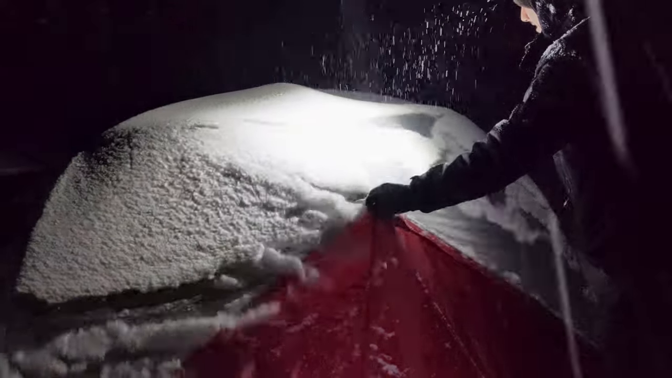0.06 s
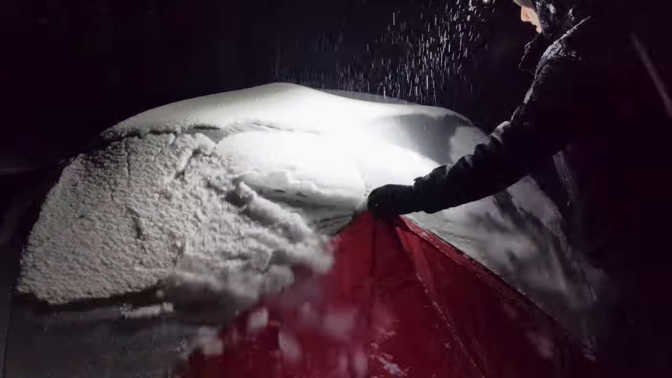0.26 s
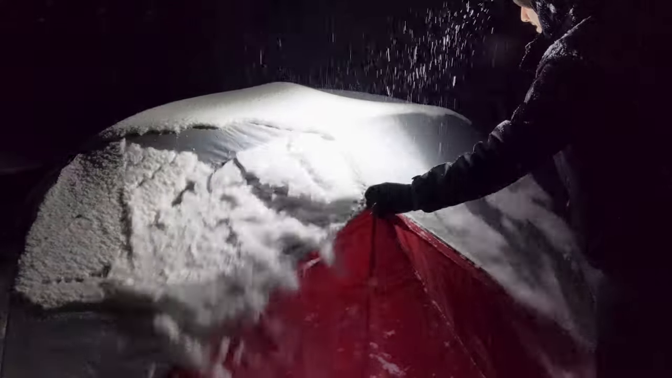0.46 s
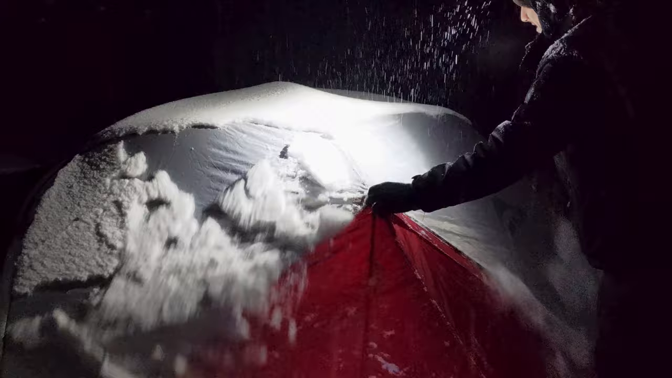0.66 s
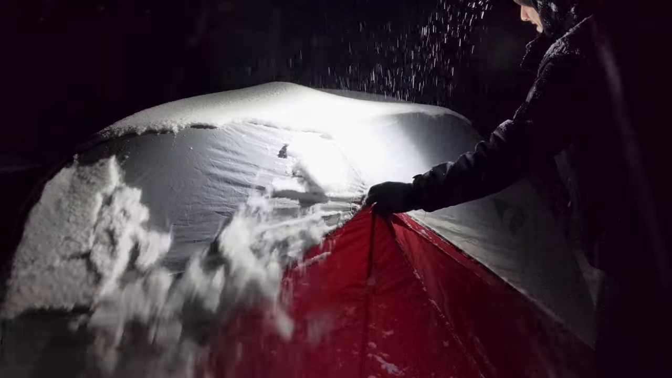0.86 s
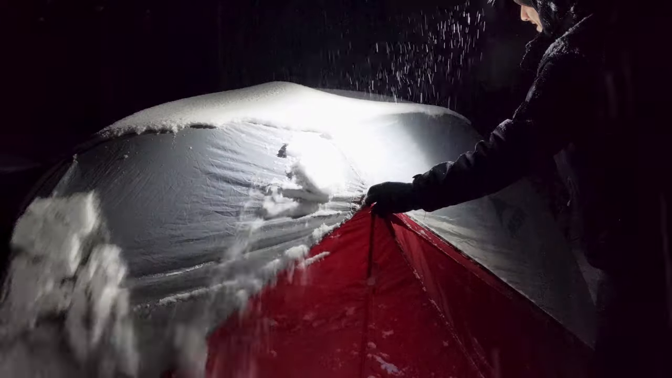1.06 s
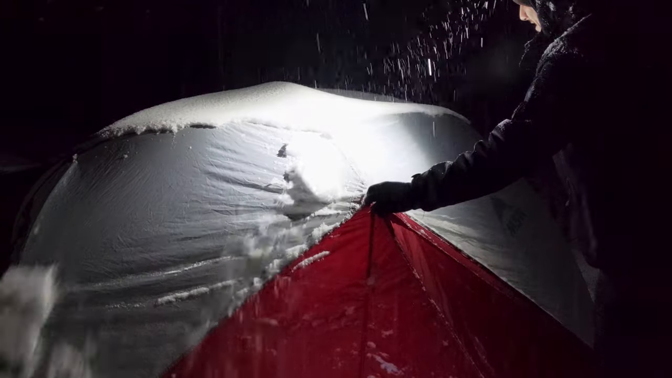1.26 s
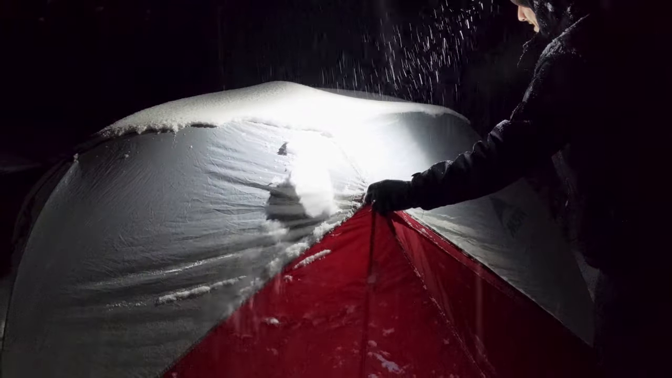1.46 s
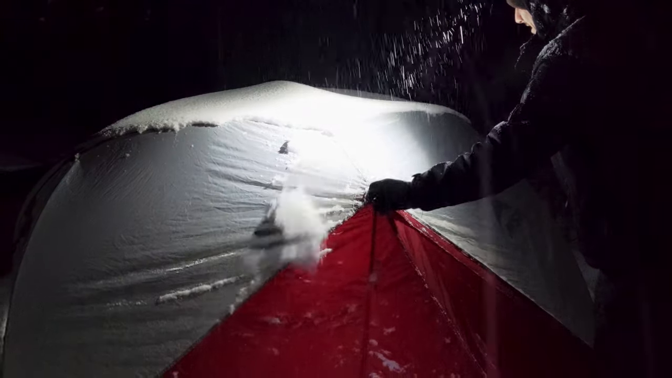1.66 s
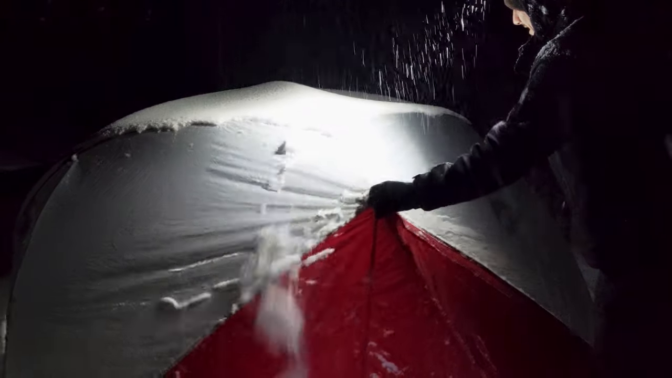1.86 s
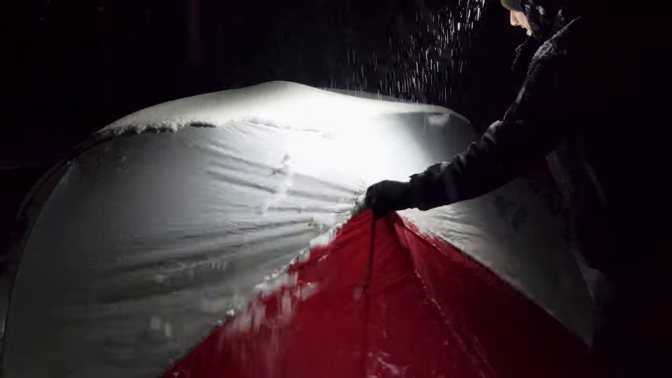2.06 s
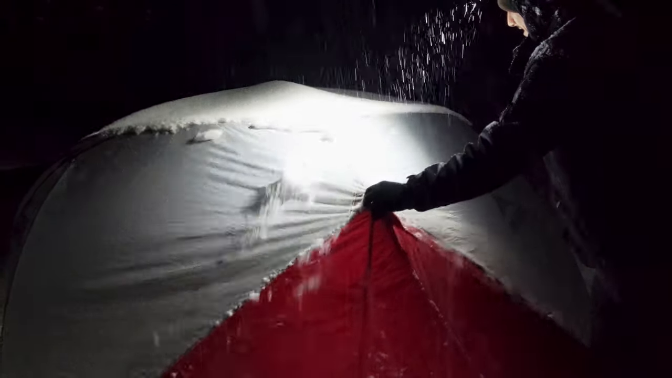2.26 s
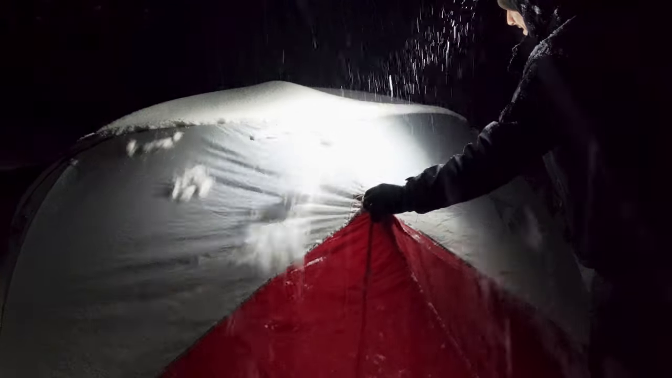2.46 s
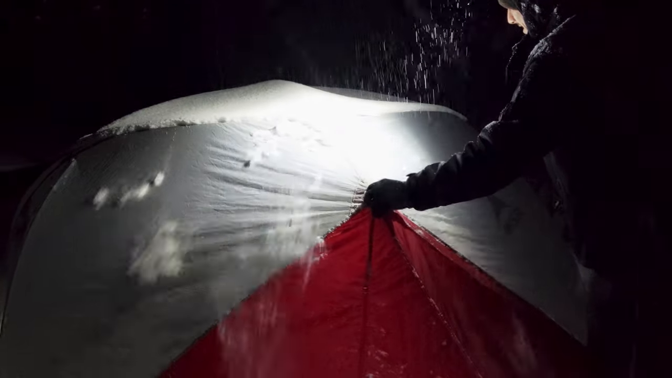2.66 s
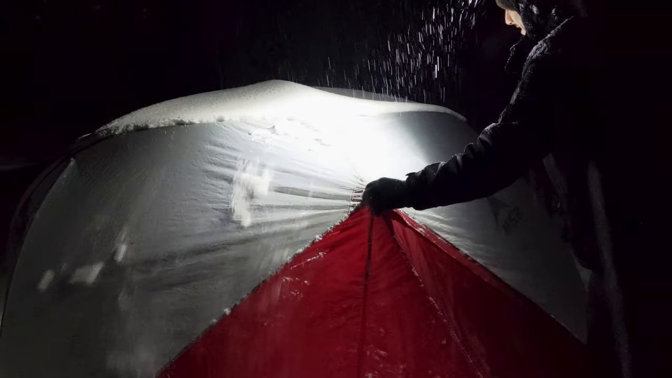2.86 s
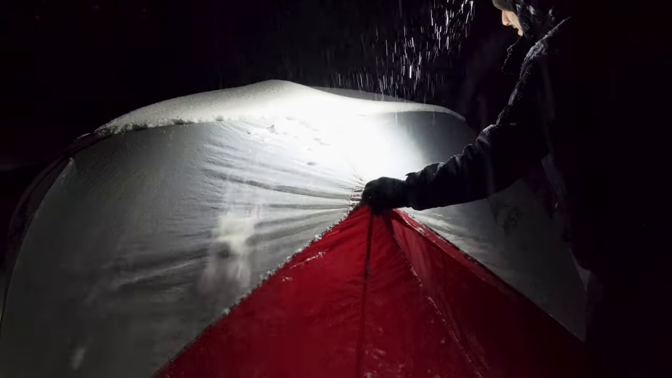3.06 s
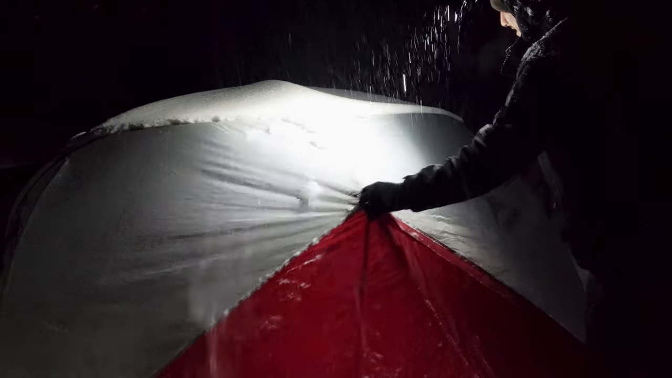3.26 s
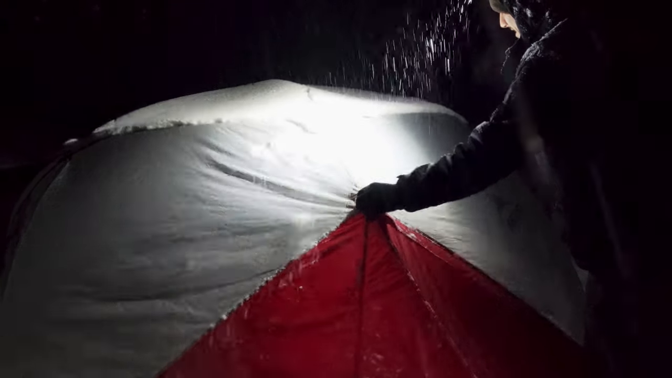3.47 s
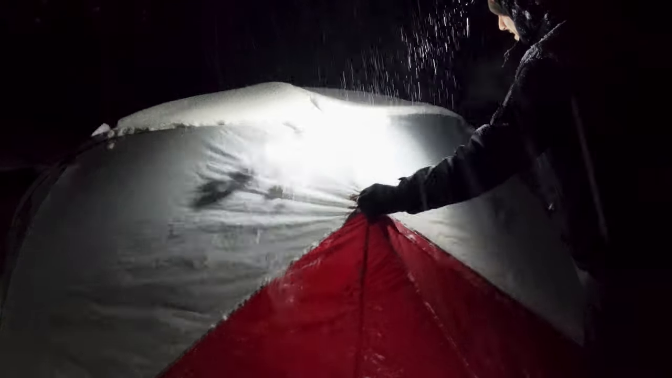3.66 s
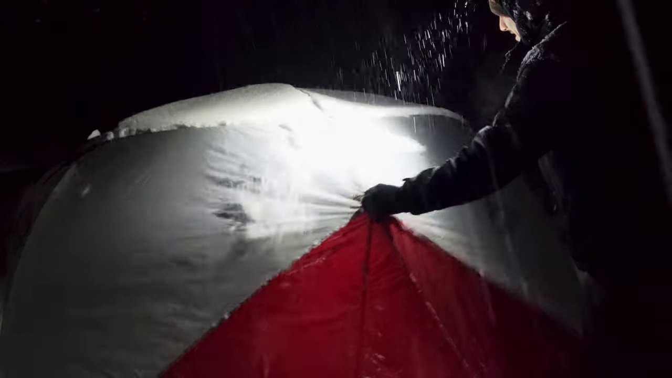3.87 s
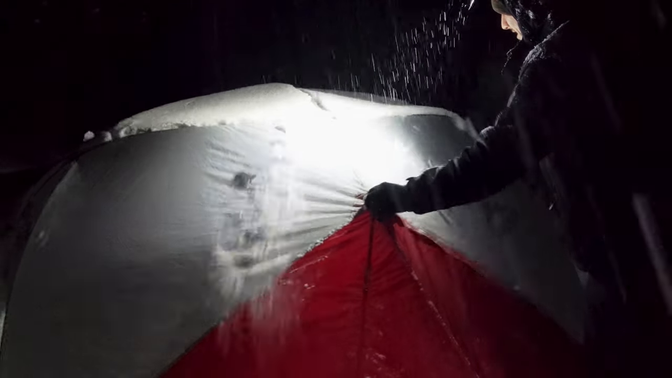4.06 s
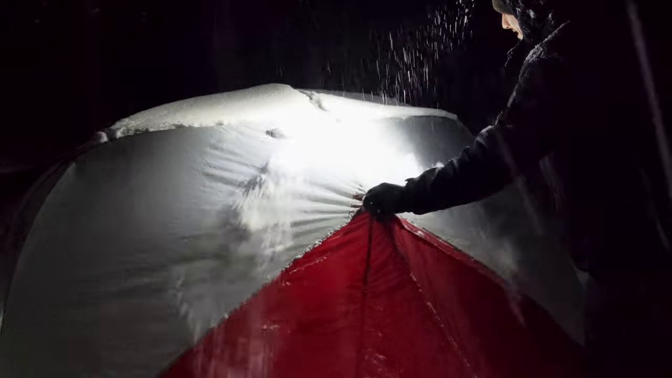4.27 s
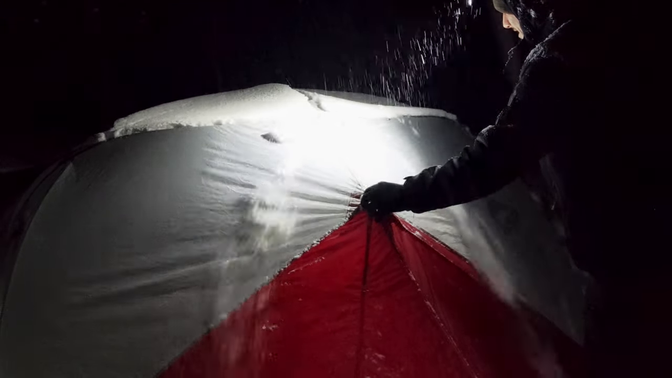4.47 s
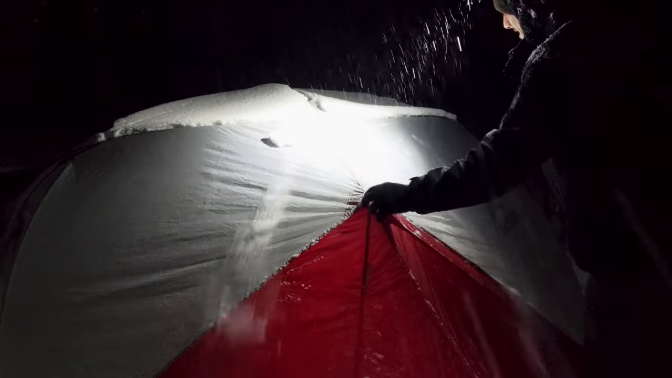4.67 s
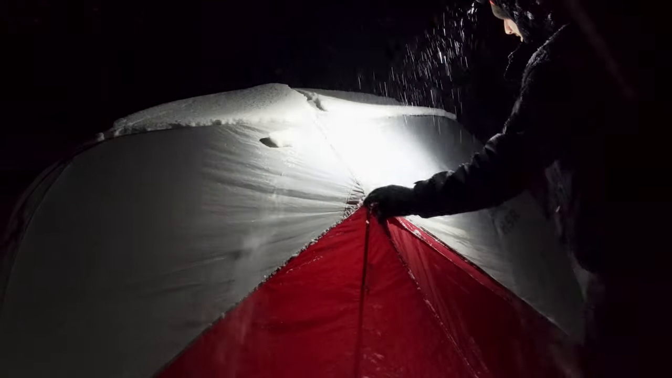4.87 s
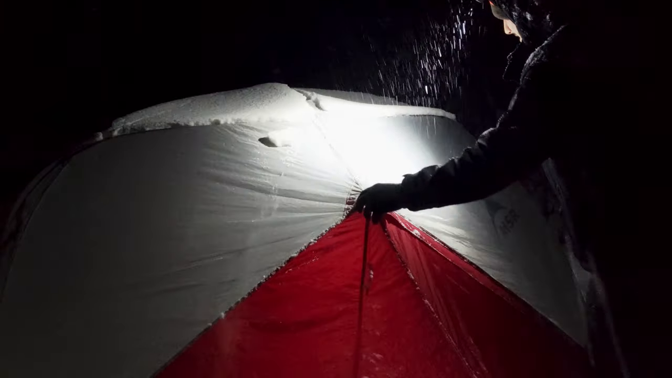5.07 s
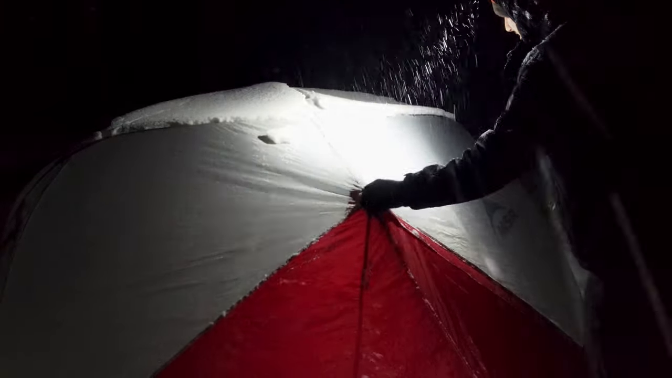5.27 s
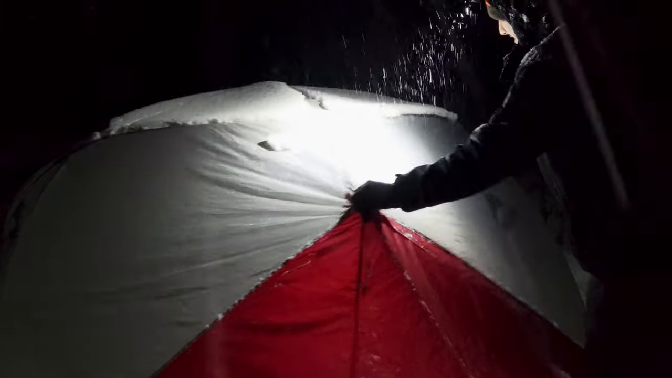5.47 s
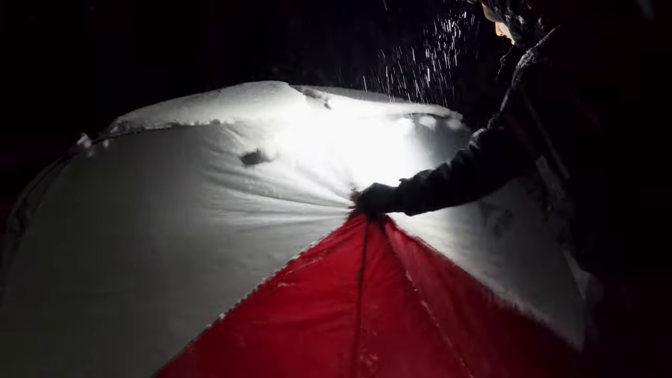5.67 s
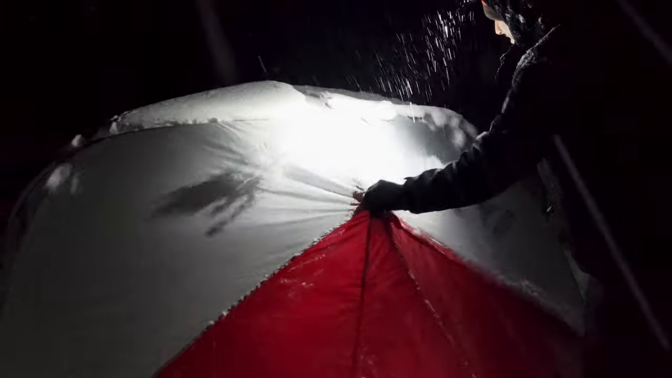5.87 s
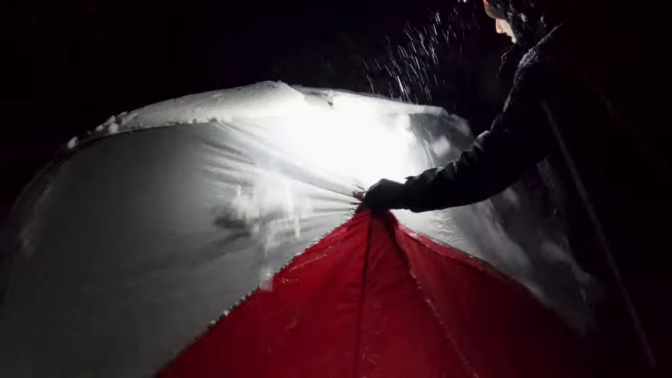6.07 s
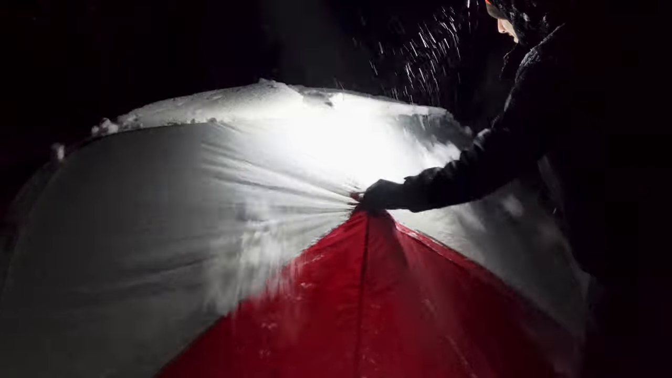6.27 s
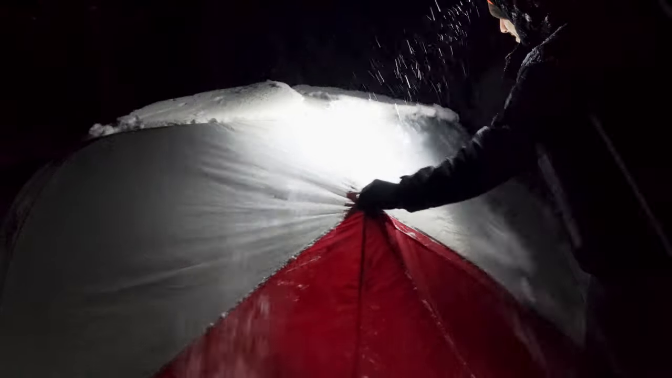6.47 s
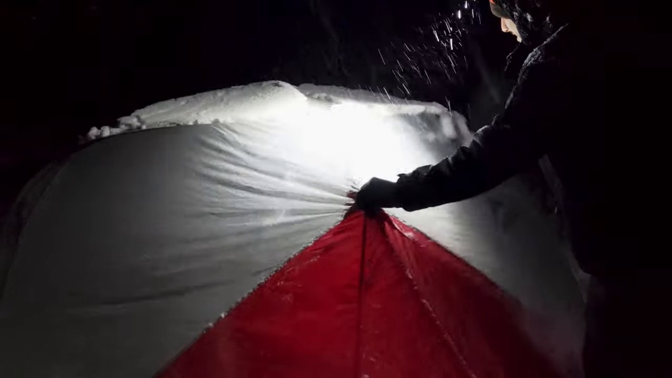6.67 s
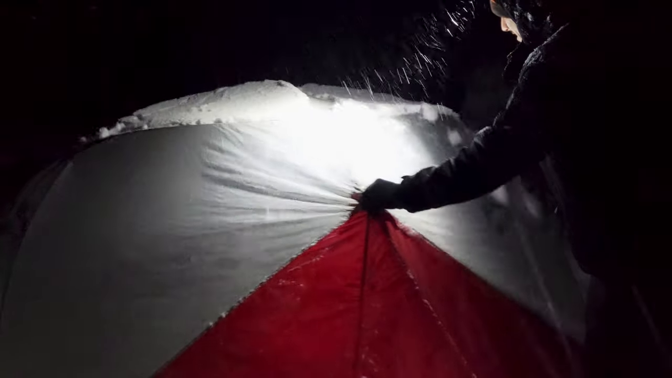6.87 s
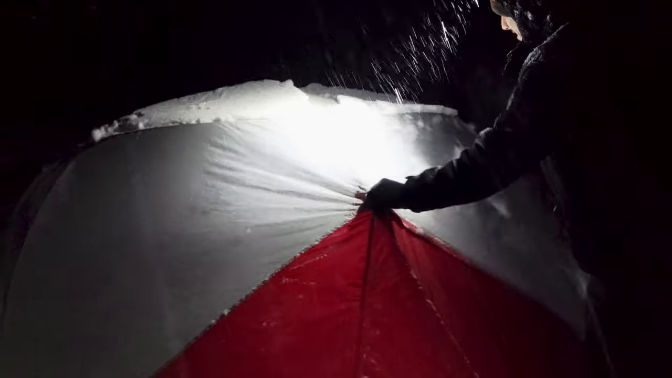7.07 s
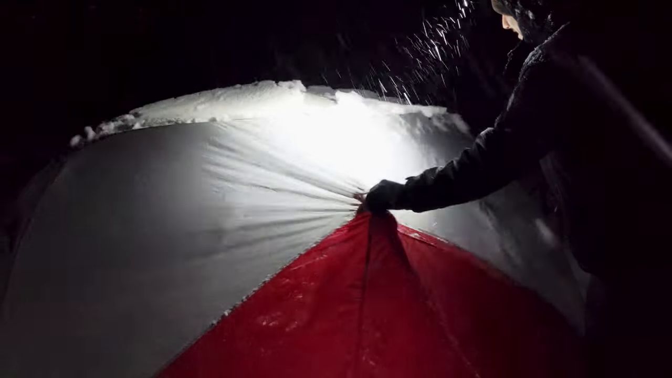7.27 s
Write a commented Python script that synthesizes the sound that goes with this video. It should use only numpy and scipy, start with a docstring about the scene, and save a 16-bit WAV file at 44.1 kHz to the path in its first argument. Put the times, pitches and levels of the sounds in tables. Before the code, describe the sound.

Snow slides hissing off a nylon tent as the fabric is shaken, flapping and snapping taut.

```python
"""Shaking snow off a tent

A gloved hand shakes a snow-laden tent about four times a second, a couple of metres away at night.
Flakes patter, and powder and slabs slide hissing down the nylon. The cloth flaps, snaps taut and
knocks on the poles; buckles and ice tick. Moving air rumbles and thumps at the microphone,
whose housing colours everything with fixed resonances."""
import sys
import numpy as np
from scipy import signal
from scipy.fft import rfft, irfft, next_fast_len
from scipy.io import wavfile
from scipy.ndimage import uniform_filter1d

SR = 44100
rng = np.random.default_rng(int(sys.argv[2]) if len(sys.argv) > 2 else 0)


def master_out(mix):
    """Clip the mix to full scale and print it as 16-bit PCM to the path in sys.argv[1]."""
    frames = np.transpose(np.atleast_2d(mix))
    ceiling = np.clip(frames, -1, 1)
    pcm = np.round(ceiling * 32767).astype(np.int16)
    wavfile.write(sys.argv[1], SR, pcm)


N = 322371
T = np.arange(N) / SR

# how hard the cloth is shaken: t/s, flapping/dB, air rumble/dB
SHAKING = [(0.0, -59, -71), (.6, -63.5, -66.5), (1.1, -65, -68.5), (1.55, -69, -69), (1.72, -65.5, -67.5),
           (1.9, -58.5, -59.5), (2.3, -62.5, -58.5), (2.7, -68, -68), (3.05, -66, -66.5),
           (3.35, -56.5, -57.5), (3.95, -59.5, -60), (4.35, -66.5, -61), (4.65, -65.5, -71.5),
           (5.15, -68.5, -68.5), (5.6, -55.5, -53), (6.1, -59, -58.5), (6.7, -58, -59), (7.31, -54, -52)]
# pulls that snap the cloth taut: start t/s, boom/dB, crack/dB, build-up/s
PULLS = [(1.897, -62, -57, 0.0083), (2.132, -55, -51, 0.0073), (2.356, -58, -52.5, 0.0095),
         (2.576, -55, -56, 0.0069), (3.308, -49, -52, 0.014), (3.546, -51, -48.5, 0.016),
         (3.782, -55, -45, 0.0098), (4.003, -56, -53, 0.012), (4.237, -58, -58, 0.0072),
         (5.57, -44.5, -42.5, 0.0098), (5.8, -44.5, -41.5, 0.018), (6.034, -45, -46, 0.013),
         (6.279, -47.5, -43.5, 0.013), (6.511, -50.5, -50.5, 0.017), (6.761, -50, -50, 0.0093),
         (6.994, -46.5, -46, 0.0075), (7.239, -48.5, -52, 0.012)]


def undb(db):
    """Decibels to gain."""
    return 10 ** (np.asarray(db) / 20)


def on_log(hz, table):
    """Read a table of f/Hz, value on a log-frequency axis."""
    freqs, values = np.transpose(table)
    return np.interp(np.log(np.maximum(hz, 1)), np.log(freqs), values)


def curves(table):
    """Fader curves from a table of breakpoints, one value per sample."""
    times, *columns = np.transpose(table)
    return [np.interp(T, times, column) for column in columns]


def walk(rate_hz):
    """A wobble that glides between random values, rate_hz of them a second; spread 1."""
    hold = int(SR / rate_hz)
    steps = np.repeat(rng.standard_normal(N // 100), hold)[:N]
    wobble = uniform_filter1d(steps, hold)
    return wobble / wobble.std()


def swell(s, rise, fall):
    """A rounded envelope that grows up to moment s and then dies away."""
    rise, fall, out = max(rise, 1e-3), max(fall, 1e-3), np.zeros(N)
    span = slice(max(int((s - 9 * rise) * SR), 0), int((s + 9 * fall) * SR))
    t = T[span] - s
    out[span] = 1 / np.cosh(t / np.where(t < 0, rise, fall))
    return out


def grains(scatter_db):
    """Dense tiny impacts: a few are larger than the rest."""
    sizes = np.minimum(rng.exponential(size=(2, N)), 5.0)
    return rng.standard_normal((2, N)) * undb(scatter_db * sizes)


def colour(pair, spectrum):
    """Shape two unrelated signals into one wide source: bass centred, treble diffuse; rms 1."""
    # stereo image: f/Hz, left-right correlation
    correlation = [(60, 1), (150, 1), (300, 0.81), (640, 0.54), (1400, 0.59), (3000, 0.029), (16000, .02)]
    size = next_fast_len(N)
    hz = np.fft.rfftfreq(size, 1 / SR)
    alike = np.clip(on_log(hz, correlation), 0, .97)
    mid, side = rfft(pair, size) * undb(on_log(hz, spectrum))
    mid, side = mid * np.sqrt(1 + alike), side * np.sqrt(1 - alike)
    out = irfft(np.array([mid + side, mid - side]), size)[:, :N]
    return out / out.std()


def near(pair):
    """One spot of the tent: a narrow image, a little to the left."""
    return (pair + 1.3 * pair.mean(axis=0)) * undb([[.8], [-.8]])


def burst(noise, shape, db):
    """Noise under an envelope, with an rms of about db at the crest."""
    x = noise * shape
    return x * undb(db) * np.sqrt(np.mean(shape ** 2) / np.mean(x ** 2))


def hits(table, decay_s, rattle, spread):
    """Short cracks, each in one broad band, with a faint rattle after it."""
    out, t = np.zeros((2, N)), np.arange(2000) / SR
    for s, peak_db, low_hz, high_hz, pan_db in table:
        shape = t / decay_s * np.exp(1 - t / decay_s) + rattle * np.exp(-t / (66 * decay_s))
        mid, side = rng.standard_normal((2, len(t))) * shape
        mid[int(decay_s * SR)] += 2.8  # the hard contact stands out of the grit
        low_cut = signal.butter(4, low_hz, "high", fs=SR, output="sos")
        high_cut = signal.butter(3, high_hz, fs=SR, output="sos")
        crack = signal.sosfilt(np.vstack([low_cut, high_cut]), [mid + spread * side, mid - spread * side])
        crack /= np.abs(crack).max(axis=1, keepdims=True)
        start = int((s + 0.00048) * SR)
        out[:, start:start + len(t)] += crack * undb(peak_db + np.array([[pan_db], [-pan_db]]) / 2)
    return out


def snowfall():
    """Flakes patter on the whole tent in a soft, wavering bed."""
    # tone of the patter: f/Hz, level/dB
    patter_eq = [(150, -17), (350, 0.5), (700, -0.5), (1500, -3), (4000, -5), (16000, -2.5)]
    return colour(grains(scatter_db=2.0), patter_eq) * undb(-59.5 + 1.7 * walk(4.7))


def trickles():
    """The last trickles of snow run off with a thin, bright glitter."""
    # tone of the glitter: f/Hz, level/dB
    glitter_eq = [(8200, -42), (9000, 7.5), (9500, 9.5), (10200, -9), (11500, -2), (12500, -35)]
    # run-offs: crest t/s, level/dB, rise/s, fall/s
    runs = [(1.25, -52.5, .12, 0.082), (2.5, -66, .1, 0.33), (4.57, -55, 0.092, 0.12),
            (6.4, -63.5, 0.23, 0.6)]
    sheen = undb(-73) + sum(undb(db) * swell(s, rise, fall) for s, db, rise, fall in runs)
    return colour(grains(scatter_db=1.0), glitter_eq) * sheen * undb(1.5 * walk(16))


def air_rumble():
    """The cloth pushes air across the microphone, with an extra gust at each snap."""
    # tone of the rumble: f/Hz, level/dB
    rumble_eq = [(15, -1.5), (30, 3), (70, -5), (150, -11.5), (400, -41)]
    _, air_db = curves(SHAKING)
    rumble = colour(rng.standard_normal((2, N)), rumble_eq) * undb(air_db + 2.0 * walk(9))
    gusts = sum(swell(s + build, rise=0.0099, fall=0.0099) for s, _, _, build in PULLS)
    return rumble * (1 + undb(-8.5) * gusts)


def air_thumps():
    """Pushed air hits the microphone in soft, low thumps."""
    # thumps of air: t/s, level/dB
    thumps = [(.04, -64), (1.58, -60), (1.64, -61), (2.36, -49.5), (4.88, -64), (5.855, -46.5)]
    # tone of a thump: f/Hz, level/dB
    thump_eq = [(30, 13), (80, -2), (150, -3.5), (300, -22), (600, -30)]
    body = colour(rng.standard_normal((2, N)), thump_eq)
    return sum(burst(body, swell(s, rise=0.01, fall=0.015), db) for s, db in thumps)


def pole_knocks():
    """The slack cloth drops back on the poles with dull knocks."""
    # knocks: t/s, peak/dB, left minus right/dB
    knocks = [(1.992, -48, 2), (5.484, -42.5, -1), (5.668, -37, 0), (6.19, -39, 0), (6.418, -43, 0),
              (6.66, -46, 0), (6.899, -43, 1), (7.145, -43, -2)]
    low_hz, high_hz = 670, 1960
    rows = [(s, db, low_hz, high_hz, pan_db) for s, db, pan_db in knocks]
    return hits(rows, decay_s=0.00079, rattle=0.26, spread=0.16)


def buckle_ticks():
    """Buckles and bits of ice strike with hard, bright ticks."""
    # ticks: t/s, peak/dB, low edge/Hz, high edge/Hz, left minus right/dB
    ticks = [(1.7484, -43, 6500, 9000, 0), (1.9444, -35.5, 6000, 9500, 3), (3.6006, -17.5, 4070, 8100, 6),
             (3.6761, -24, 6050, 17300, 2), (3.6824, -33, 7000, 17000, 0), (3.917, -32, 11500, 16000, .5),
             (5.8546, -27.5, 1500, 5400, -7)]
    return hits(ticks, decay_s=0.00038, rattle=0.045, spread=0.6)


def cloth_flaps():
    """The loose nylon flutters, slightly to the left."""
    # tone of the flapping: f/Hz, level/dB
    flap_eq = [(60, -12), (120, -5.5), (180, -1), (280, -1), (400, -2.5), (600, -8), (1200, -8.5),
               (2500, -25)]
    flap_db, _ = curves(SHAKING)
    flap = colour(rng.standard_normal((2, N)), flap_eq) * undb([[.7], [-.7]])
    return flap * undb(flap_db + 1.58 * walk(18))


def cloth_snaps():
    """Each pull tightens the panel: a boom builds, the weave cracks taut, rustles and swings back."""
    # tone of the panel's boom: f/Hz, level/dB
    boom_eq = [(60, -27), (150, 3), (220, 2), (330, 5), (500, -4), (900, -23)]
    # tone of the weave's crackle: f/Hz, level/dB
    crackle_eq = [(300, -4), (700, 4.5), (1400, 2.5), (2600, -4), (4000, -8), (6000, -32), (12000, -48)]
    boom = near(colour(rng.standard_normal((2, N)), boom_eq))
    crackle = near(colour(grains(scatter_db=1.5), crackle_eq))
    out = np.zeros((2, N))
    for s, boom_db, crack_db, build in PULLS:
        taut = s + build
        rustle, swing_back = taut + 0.016, taut + 0.1245
        out += burst(boom, swell(taut - 0.003, rise=0.85 * build, fall=0.0099), boom_db)
        out += burst(crackle, swell(taut, rise=0.48 * build, fall=0.002), crack_db)
        out += burst(crackle, swell(rustle, rise=0.0064, fall=0.014), crack_db - 11)
        if swing_back < T[-1]:
            out += burst(boom, swell(swing_back, rise=0.011, fall=0.011), boom_db - 15.5)
    return out


def sliding_snow():
    """Powder hisses down the nylon, its finest spray sizzles above and heavy slabs scrape below."""
    # steady flow: t/s, powder hiss/dB, slab scrape/dB
    flow = [(0.0, -47.5, -51.5), (.3, -46, -50), (.85, -45, -52.5), (1.14, -46, -56.5), (1.27, -48, -59),
            (1.36, -52.5, -60), (1.42, -61.5, -64.5), (1.7, -60, -62.5), (1.9, -59, -56), (2.15, -57, -59),
            (2.35, -54, -59.5), (2.65, -55.5, -64.5), (3.1, -60, -63.5), (3.3, -60.5, -55.5),
            (3.75, -54, -57), (4.22, -56.5, -61.5), (4.6, -54, -65), (4.85, -60, -70.5),
            (5.2, -72.5, -64.5), (5.5, -59.5, -58.5), (5.9, -54, -55.5), (6.5, -53.5, -57.5),
            (7.31, -56.5, -58.5)]
    # puffs of powder shaken loose: crest t/s, level/dB, fall/s
    loose_puffs = [(1.5, -59, 0.033), (1.767, -54.5, 0.022), (1.842, -55.5, 0.015), (1.955, -54, 0.043),
                   (2.212, -50, 0.035), (2.565, -56.5, .03), (3.245, -57, 0.034), (3.362, -56, 0.047),
                   (3.84, -63, 0.045), (4.086, -55, .03), (4.303, -57, 0.027), (5.094, -63, .025),
                   (5.226, -61.5, 0.024), (5.36, -56, .06), (5.6, -59, 0.023), (5.677, -55.5, 0.047),
                   (5.852, -52, 0.033), (6.063, -54, 0.056), (6.333, -49.5, 0.029), (6.817, -56.5, 0.025),
                   (7.05, -54.5, 0.038), (7.3, -54, 0.051)]
    # tones of the three layers: f/Hz, level/dB
    powder_eq = [(1500, -13.5), (3000, -3.5), (5000, -1.5), (8000, -1.5), (10000, -5.5), (16000, -11)]
    spray_eq = [(4000, -18), (7000, -9.5), (9500, 2.5), (16000, -2)]
    slab_eq = [(300, -12.5), (700, -3.5), (1200, 2.5), (2500, 4), (4000, -5), (6000, -15)]
    hiss_db, slab_db = curves(flow)
    puffs = sum(undb(db) * swell(s, 0.62 * fall, fall) for s, db, fall in loose_puffs)
    stutter = walk(12)  # all layers catch on the creases together
    powder = colour(grains(scatter_db=2.0), powder_eq) * undb(0.51 * stutter + 1.2 * walk(45))
    spray = colour(grains(scatter_db=1.5), spray_eq) * undb(1.5 + 0.73 * stutter + 0.78 * walk(30))
    slab = colour(grains(scatter_db=1.5), slab_eq) * undb(0.22 * stutter + 1.35 * walk(25))
    # puffs add in power to the flow, with a little more spray and less coarse snow
    powder *= np.hypot(undb(hiss_db), puffs)
    spray *= np.hypot(undb(hiss_db), undb(1) * puffs)
    slab *= np.hypot(undb(slab_db), undb(-6.5) * puffs)
    return powder + spray + slab


def scene():
    """Snow, cloth, poles and small hard parts together in the open."""
    bed = snowfall() + trickles() + air_rumble()
    impacts = air_thumps() + pole_knocks() + buckle_ticks()
    return bed + impacts + cloth_flaps() + cloth_snaps() + sliding_snow()


def record(dry):
    """The microphone housing lifts and dips fixed bands; a steep low-pass cuts the top."""
    # housing resonances and dips: f/Hz, width/Hz, gain/dB
    housing = [(564, 263, -3.5), (1620, 230, 4), (1865, 800, -6.5), (2310, 140, 2.5), (4480, 370, -3),
               (5620, 900, 7), (6430, 570, -4), (7380, 370, 4), (8600, 650, -2), (9170, 600, -0.5),
               (10840, 750, -3), (11600, 830, 2)]
    top_hz = 15740
    x = dry * undb(-0.5)
    for hz, width, db in housing:
        b, a = signal.iirpeak(hz, hz / width, SR)
        x = x + (undb(db) - 1) * signal.lfilter(b, a, x)
    return signal.sosfilt(signal.ellip(12, .2, 75, top_hz, fs=SR, output="sos"), x)


dry = scene()
out = record(dry)
master_out(out)
```